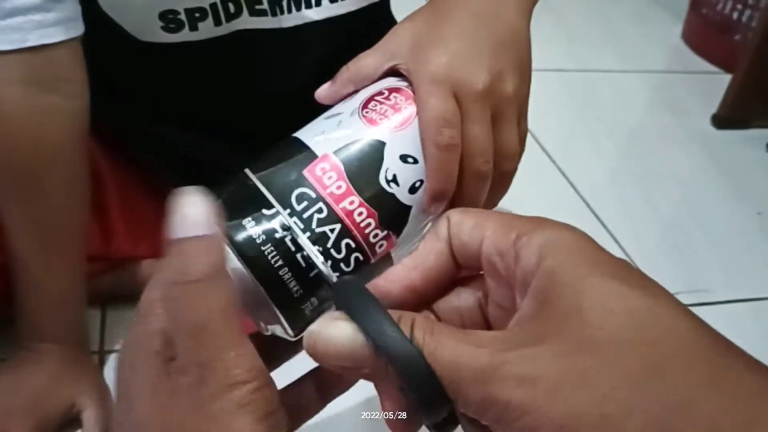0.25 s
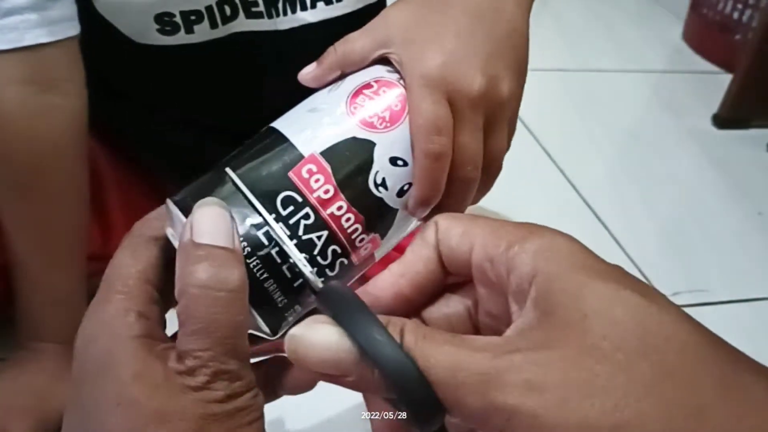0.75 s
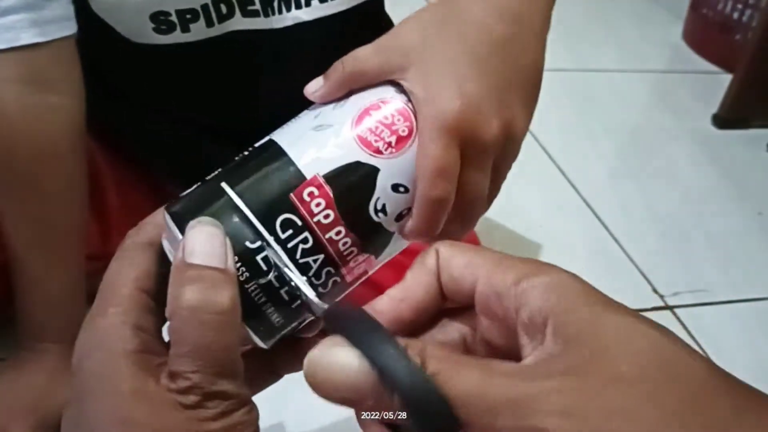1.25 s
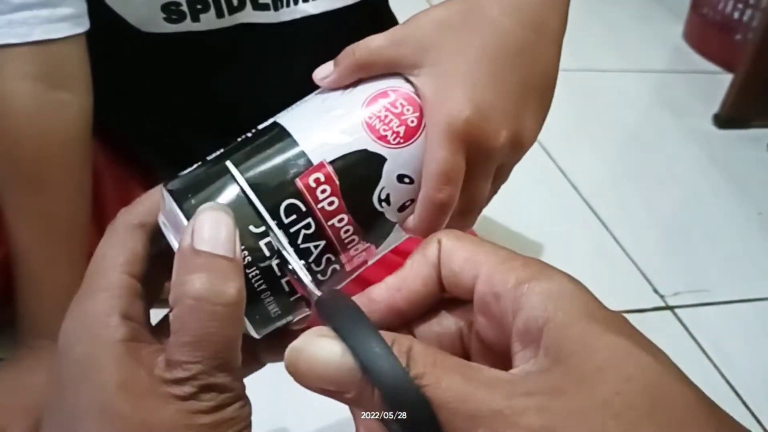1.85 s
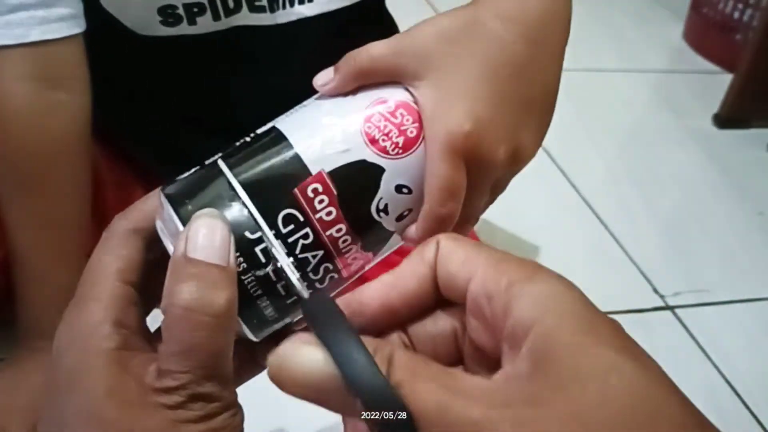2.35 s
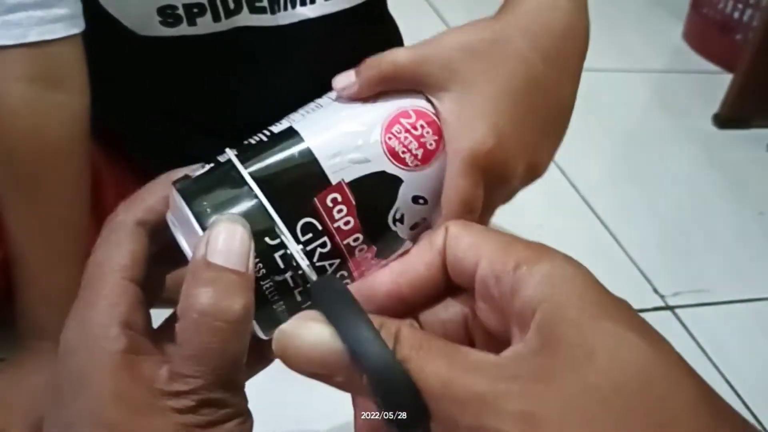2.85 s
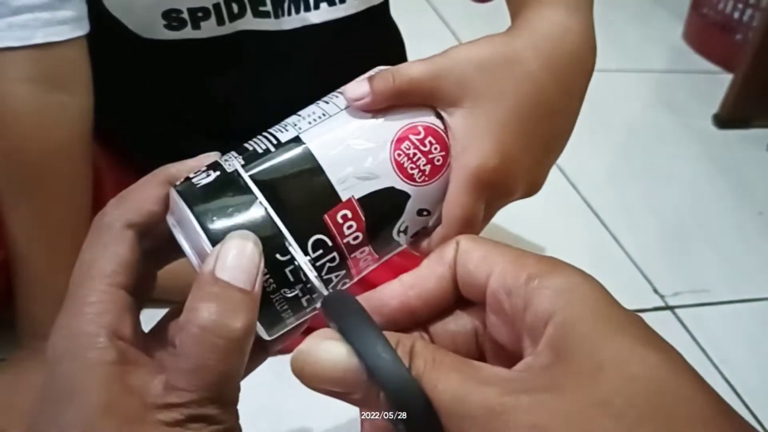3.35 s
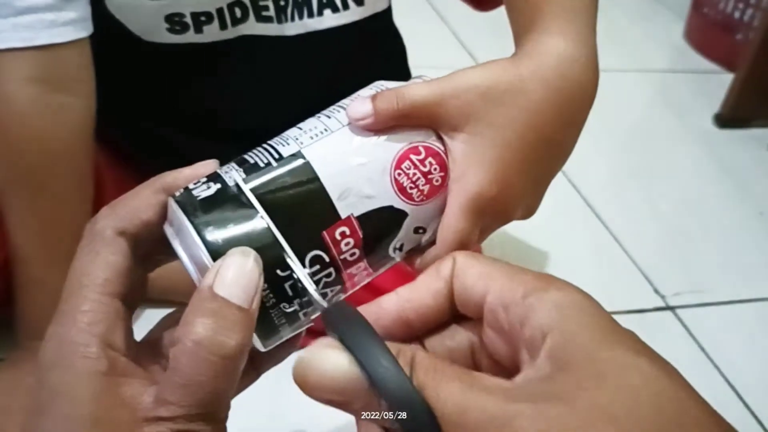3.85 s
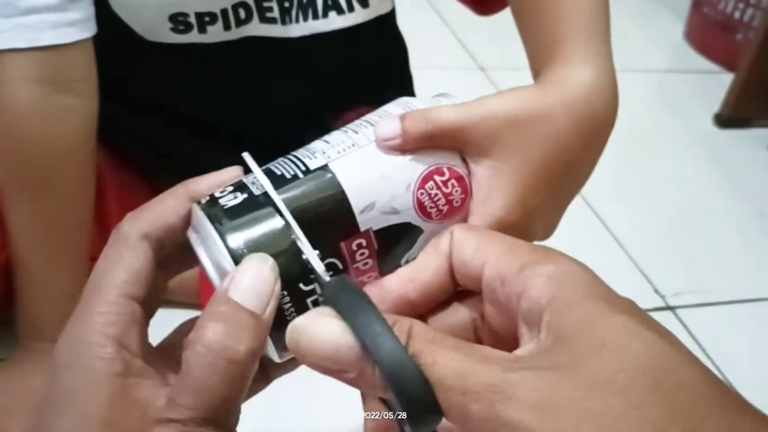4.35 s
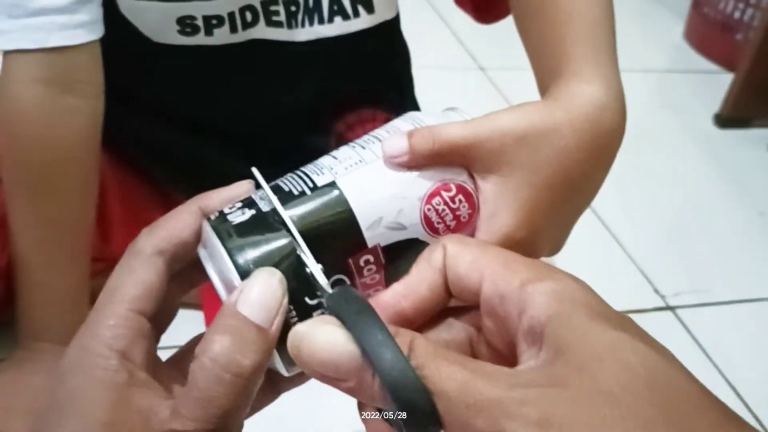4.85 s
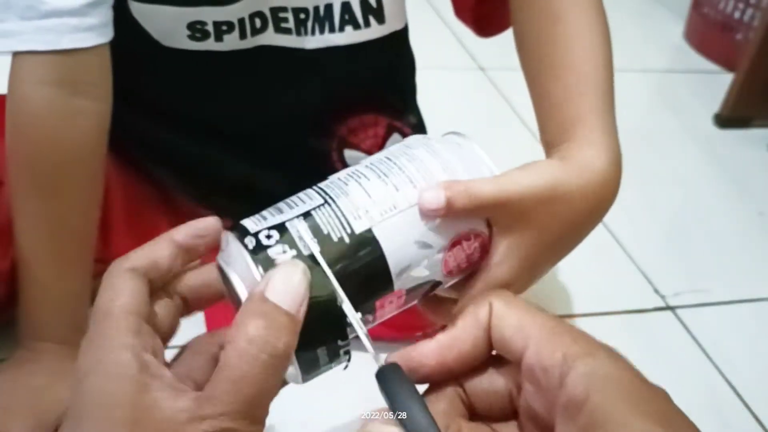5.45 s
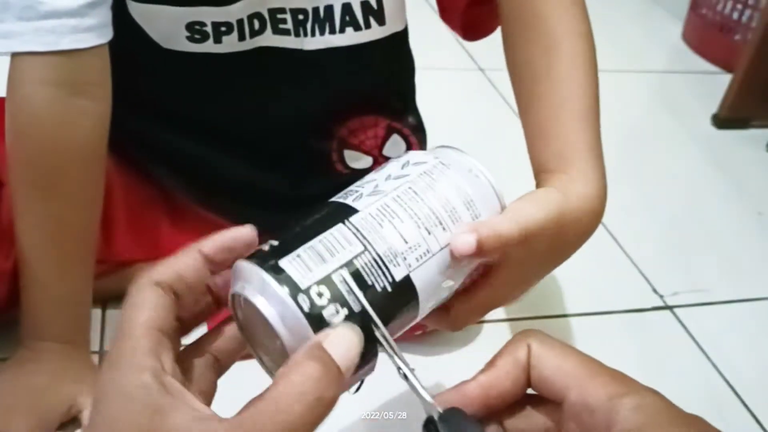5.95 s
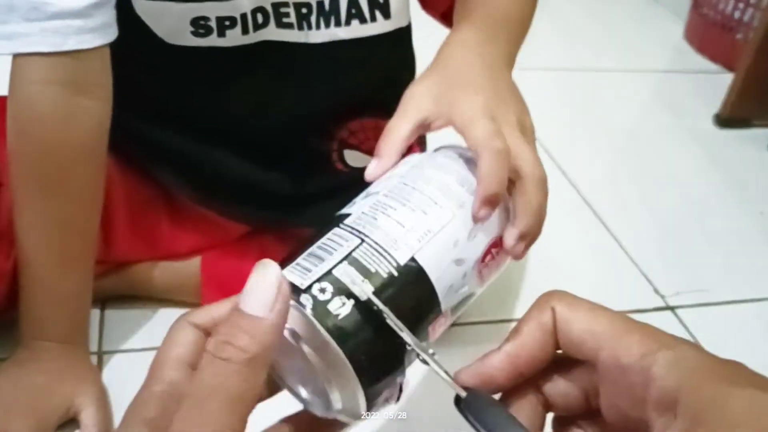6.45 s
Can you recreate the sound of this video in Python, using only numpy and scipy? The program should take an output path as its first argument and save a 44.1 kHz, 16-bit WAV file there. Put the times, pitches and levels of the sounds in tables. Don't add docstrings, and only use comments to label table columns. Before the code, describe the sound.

Loud close crunches and clicks of thin sheet metal being snipped, dents popping, blades grinding and briefly squealing, in a small hard-surfaced room.

```python
import sys
import numpy as np
from scipy import signal
from scipy.fft import rfft, irfft
from scipy.io import wavfile
from scipy.ndimage import uniform_filter1d

SR = 44100
rng = np.random.default_rng(int(sys.argv[2]) if len(sys.argv) > 2 else 0)


def gain_from_db(level_db):
    decades = np.asarray(level_db, float) / 20
    return 10 ** decades


def store_wav(level_fs):
    pcm = np.round(np.clip(np.atleast_2d(level_fs), -1, 1) * 32767)
    wavfile.write(sys.argv[1], SR, pcm.T.astype(np.int16))


N = 295029


def rms_one(x):
    return x / np.sqrt(np.mean(x ** 2) + 1e-20)


def in_time(rows):
    s, *columns = np.transpose(rows)
    return [np.interp(np.arange(N) / SR, s, c) for c in columns]


def at_hz(points, hz):
    table_hz, value = np.array(points).T
    return np.interp(np.log(hz + 1), np.log(table_hz), value)


def drift(rate_hz):
    r = np.exp(-2 * np.pi * rate_hz / SR)
    wander = signal.lfilter([1], [1, -2 * r, r * r], rng.standard_normal(N + SR))
    return rms_one(wander[SR:])


def passed(x, hz, kind, order=2):
    return signal.sosfilt(signal.butter(order, hz, kind, fs=SR, output="sos"), x)


def resonance(x, hz, width_hz):
    r = np.exp(-np.pi * width_hz / SR)
    gain = np.sqrt(1 - r * r) / 2
    feedback = [1, -2 * r * np.cos(2 * np.pi * hz / SR), r * r]
    return signal.lfilter(gain * np.array([1, 0, -1]), feedback, x)


# t/s, peak level/dB, brightness/dB, after-ring/dB
DENT_TICKS = [(1.342, -13.5, -12.5, -21), (1.582, -36, -6, -24), (.94, -38, -5, -25),
              (1.824, -34, -12, -10), (4.289, -34, -14, -20), (4.27, -30, -20, -20), (4.238, -30, -20, -20),
              (6.44, -34, -20, -20), (1.773, -36, -6, -24), (2.178, -20.5, -9, -7.5),
              (2.229, -10.5, -19, -22), (2.375, -17.5, -5.5, -36), (2.717, -13.5, -15, -19),
              (2.941, -15.5, -13.5, -28), (3.137, -15.5, -32, -16.5), (3.165, -26.5, -34, -11),
              (3.203, -24, -23, -40), (3.256, -31, -13, -18), (4.787, -36.5, -22, -22),
              (3.644, -19.5, -11.5, -12.5), (3.789, -21, -30, -34), (4.255, -22.5, -21, -23.5),
              (4.426, -18, -25, -25.5), (4.499, -11.5, -14.5, -44.5), (5.998, -25, -14, -4.5),
              (6.657, -18.5, -30, -23.5), (6.673, -29.5, -1, -13)]
BUCKLES = [(.582, -27, -13, -17), (.745, -23.5, -17, -21.5), (1.092, -26.5, -29, -24),
           (2.283, -11.5, -13.5, -16.5), (2.299, -9, -17, -23), (2.354, -15.5, -13.5, -31.5),
           (3.763, -15, -20, -15.5), (3.9, -8, -4, -15), (3.947, -6.5, -31, -17), (4.454, -18, -16, -8.5),
           (4.482, -9.5, -13, -46), (4.72, -25, -27, -22), (4.872, -22, -8.5, -36.5), (5.257, -16, -8, -32),
           (5.287, -29, -10, -37), (6.048, -3, -5, -25.5), (6.32, -17.5, -4.5, -19.5),
           (6.609, -27, -8.5, -19)]
CRACKS = [(-.06, 0.5, -13, -15), (.323, -5, -48, -26), (1.16, -25, -17, -19.5), (2.031, -5, -30, -26),
          (2.038, -9.5, -7, -27.5), (2.079, -13, -21, -18.5), (2.492, 2, -26.5, -18),
          (2.52, -3.5, -17, -38), (2.642, -3, -5, -20), (2.657, -3.5, -8, -38), (3.036, -28, -18, -23),
          (3.509, -15, -40, -18.5), (3.615, -23, -24, -8), (3.936, -2.5, -27, -12), (3.985, -1.5, -25, -21),
          (4.019, 5, -26.5, -32.5), (4.039, -9, -29, -11.5), (4.161, -13, -33, -19.5),
          (4.883, -6, -5.5, -18.5), (4.976, -2, -10, -18), (5.764, 2, -13.5, -20.5), (5.807, -3, -26, -18),
          (6.009, 1, -44, -21), (6.147, -6, -35, -6), (6.418, -25.5, -9.5, -14), (6.622, -13.5, -20, -17)]
TEARS = [(.245, -4, -30, -17), (.377, 2.5, -20.5, -23), (.4435, -3, -23.5, -50), (.694, -29, -27, -13.5),
         (1.609, -7, -24, -20.5), (2.197, -9, -18, -13.5), (2.502, 2.5, -27, -24),
         (3.095, -9, -10.5, -19.5), (3.439, -28.5, -15, -14), (3.48, -17, -26.5, -14.5),
         (3.674, 1, -18, -19.5), (3.887, -22.5, -24.5, -32), (5.15, -6, -11.5, -17), (5.198, -13, -21, -37),
         (6.026, -6, -21, -23), (6.163, -1, -9.5, -30.5), (6.168, -7, -12, -30), (2.527, -8, -25, -30),
         (6.594, -26.5, -24, -14)]
NIPS = [(.266, 0, -30, -32.5), (1.14, -1, -12.5, -19.5), (1.2025, -1, -15, -21.5), (1.229, -13.5, -17, -10),
        (1.332, -2, -7.5, -24.5), (1.416, 4, -17, -30.5), (1.954, -15.5, -43, -28), (2.007, -7.5, -46, -8),
        (2.014, -7.5, -54, -20), (2.059, 1.5, -35, -32), (2.91, -15, -44, -12.5), (2.9945, 1.5, -32, -21.5),
        (4.971, 8, -18, -40.5), (5.361, -6, -6, -21.5), (5.375, -8, 3.5, -28), (5.398, -29, 9, -30.5),
        (5.431, -7.5, -8, -14), (6.302, -26, -20, -33)]
SHEARS = [(.2185, 1.5, -22, -21), (2.481, -18.5, -20.5, -30.5), (1.917, -25, -18, -30),
          (1.924, -16, -26, -22), (1.946, -20, -30, -14), (1.974, -14, -52, -20), (2.928, -13, -39.5, -7),
          (2.9585, 4, -32, -23.5), (3.486, -10, -34, -29.5), (5.026, -3.5, -20, -24),
          (5.063, -3, -29.5, -20.5)]


def all_snaps():
    # snaps, boom/dB, tear/ms
    kinds = [(DENT_TICKS, -12, 2.38), (BUCKLES, -14.5, 6.4), (CRACKS, -23, 3.06),
             (TEARS, -22.5, 5.2), (NIPS, -32.5, 3.22), (SHEARS, -32.5, 5.3)]
    return np.transpose([(*row, boom_db, tear_ms) for rows, boom_db, tear_ms in kinds for row in rows])


def bursts(db, rise_s, fall_s):
    power = np.zeros(N + SR)
    rises, falls = rise_s + 0 * db, np.maximum(fall_s + 0 * db, .0005)
    for s, gain, rise, fall in zip(all_snaps()[0], gain_from_db(db), rises, falls):
        t = np.arange(int(min(9 * fall, .5) * SR)) / SR
        at = int((s + .1007) * SR)
        power[at:at + len(t)] += (gain * (1 - np.exp(-(t / rise) ** 2)) * np.exp(-t / fall)) ** 2
    return np.sqrt(power[SR // 10:SR // 10 + N])


BAND_EDGES_HZ = [280, 1400, 2900, 5500, 9300, 17000]
# f/Hz, width/Hz, level/dB
HOLLOW = [(455, 180, -6), (684, 39, -6), (765, 58, -8), (915, 74, -2), (1100, 450, 0)]
# f/Hz, width/Hz, level/dB
SHELL = [(1900, 220, -9), (2033, 56, -10.5), (2635, 900, -3), (3184, 210, 0), (3686, 380, 1),
         (4500, 920, 2.5), (5520, 550, 0), (5930, 340, -1.5), (7540, 990, 2.5), (8210, 180, 2),
         (8740, 1100, -2), (13800, 2800, -12), (15070, 720, -4.5)]


def metal(envelopes, scatter, modes_db):
    force, out = rng.standard_normal((2, N)) * scatter, 0
    dense_db = [0.0, -16.5, -14.5, -6.0, -6.5]
    for envelope, low, high, db in zip(envelopes, BAND_EDGES_HZ, BAND_EDGES_HZ[1:], dense_db):
        out = out + gain_from_db(db) * passed(force[0] * envelope, [low, high], "band")
    grip_db = [1.56 * drift(5.5) for k in range(5)]
    for k, (hz, width_hz, db) in enumerate(HOLLOW + SHELL):
        band = np.clip(np.searchsorted(BAND_EDGES_HZ, hz) - 1, 0, 4)
        push = force[1] * envelopes[band] * gain_from_db(grip_db[k % 5])
        out += (-1) ** k * gain_from_db(db + modes_db) * resonance(push, hz, width_hz)
    return out


def fine_modes(x, t60):
    t = np.arange(SR // 5) / SR
    response = rng.standard_normal(len(t)) * gain_from_db(-60 * t / t60)
    return signal.fftconvolve(x, response / np.sqrt(np.sum(response ** 2)))[:N]


AFTER_RING_T60_S = [0.3, 0.37, 0.43, 0.4, .33]


def snaps():
    s, peak_db, bright_db, ring_db, boom_db, tear_ms = all_snaps()
    band_db = [peak_db + boom_db + 15.5,
               peak_db + 0.24 * boom_db + 3,
               peak_db - 5.5,
               peak_db + 0.5 * bright_db + 6,
               peak_db + bright_db + 13.5]
    slow_s = 0.33 * np.clip(tear_ms - 3, 0, None) / 1000
    bite_db = 4 - 2 * tear_ms
    tears, tails = [], []
    for db, rise_s, t60 in zip(band_db, [.0008] + 4 * [.00015], AFTER_RING_T60_S):
        tear = bursts(db, rise_s + slow_s, tear_ms / 1000)
        bite = bursts(db + bite_db, .00008, 0.00045)
        tears.append(np.hypot(tear, bite))
        tails.append(bursts(db + ring_db + 4.5, 0.0059, t60 / np.log(1000)))
    cracks = metal(tears, scatter=0.83, modes_db=-6.5)
    diffuse = metal(tails, scatter=gain_from_db(2.43 * drift(150)), modes_db=-7)
    shell_answer = diffuse + fine_modes(diffuse, t60=0.046)
    return cracks + gain_from_db(-11.0) * room(cracks) + gain_from_db(-3.0) * shell_answer


# t/s, peak level/dB, f/Hz
CLICKS = [(0.2663, 0, 4570.0), (0.3234, -7, 4220.0), (0.3794, 0, 8010.0), (0.4452, -7, 7410.0),
          (1.1417, 0, 8700.0), (1.2047, -2, 1980.0), (1.3339, -1, 7410.0), (1.3424, -5, 7320.0),
          (1.4183, -1, 8870.0), (1.611, -2, 8100.0), (2.0078, -13, 3700.0), (2.0325, -9, 3530.0),
          (2.0599, 0, 3530.0), (2.0809, -12, 8790.0), (2.4928, 0, 3190.0), (2.5035, -3, 7840.0),
          (2.5211, -7, 7750.0), (2.6582, 0, 7320.0), (2.9595, 0, 3270.0), (3.0966, -5, 6550.0),
          (3.6749, 0, 5680.0), (3.901, -1, 8440.0), (4.0204, 0, 1380.0), (4.4826, -5, 1120.0),
          (4.4971, -11, 1210.0), (4.8843, 0, 8100.0), (5.0649, -7, 4390.0), (5.1526, -4, 8790.0),
          (5.3624, 0, 5600.0), (5.7652, 0, 7580.0), (5.8086, -7, 1810.0), (6.01, -2, 2330.0),
          (6.0498, 0, 7490.0), (6.1483, -10, 1030.0)]


def clicks():
    out, t = np.zeros(N + SR), np.arange(SR // 100) / SR
    for s, db, hz in CLICKS:
        at = int(s * SR)
        out[at:at + len(t)] += gain_from_db(db) * np.exp(-t / .0004) * np.sin(2 * np.pi * hz * t)
    return out[:N]


# start t/s, hardest t/s, end t/s, level/dB
STROKES = [(0, 0.092, 0.17, -36.5), (1.723, 1.855, 1.92, -42), (4.28, 4.39, 4.44, -44),
           (1.87, 1.983, 2.2, -39), (2.115, 2.227, 2.54, -34), (2.861, 3.05, 3.217, -33),
           (3.594, 3.654, 3.66, -34), (3.82, 3.95, 4.29, -33), (4.42, 4.5, 4.57, -27.5),
           (4.9, 5.05, 5.21, -29), (5.874, 6.023, 6.44, -36.5), (6.303, 6.514, 6.7, -43.5)]


def grinding():
    t = np.arange(N) / SR
    press_db, ease_db, lift_s = 8.5, 9.5, 0.021
    closed = 0
    for start, hardest, end, db in STROKES:
        push_db = np.interp(t, [start, hardest, end], [db - press_db, db, db - ease_db])
        touching = np.clip(np.minimum(t - start, end - t) / lift_s, 0, 1)
        closed = closed + gain_from_db(push_db) * touching
    slip_happens = rng.random(N) < 7000 / SR
    slips = slip_happens * gain_from_db(3.0 * np.minimum(rng.exponential(1, N), 4))
    pressure = uniform_filter1d(closed, size=800) * gain_from_db(-4.5 + 1.0 * drift(61))
    shares_db = [3, 3.0, 5.5, 2.0, 2.5]
    return metal([pressure * gain_from_db(db) for db in shares_db], scatter=rms_one(slips), modes_db=-8.0)


def wavering_tone(rows, rough_db, wander):
    hz, db = in_time(rows)
    t = np.arange(N) / SR
    inside = np.clip(np.minimum(t - rows[0][0], rows[-1][0] - t) / .008, 0, 1)
    turns = np.cumsum(hz * (1 + wander)) / SR
    return np.sqrt(2) * inside * gain_from_db(db + rough_db) * np.sin(2 * np.pi * turns)


# start t/s, end t/s, top f/Hz, first level/dB, last level/dB
SQUEALS = [(4.205, 4.43, 8420, -43, -51), (4.262, 4.39, 8040, -47, -54), (4.19, 4.41, 10750, -54, -60),
           (4.23, 4.4, 4580, -50, -58), (4.26, 4.38, 12800, -63, -64), (4.165, 4.22, 17400, -49, -50),
           (4.21, 4.262, 15800, -52, -43), (4.405, 4.452, 15900, -46, -55), (4.43, 4.465, 16700, -46, -47),
           (5.92, 6.03, 14420, -53, -46), (5.915, 6.0, 13020, -53, -55), (5.975, 6.02, 11000, -50, -55)]
# t/s, share of top pitch [1]
BEND = [(4.165, .74), (4.215, .89), (4.262, .988), (4.32, 1.0), (4.405, .974), (4.46, .86), (5.9, .97),
        (5.955, 1.0), (6.04, .985)]


def squeals():
    rough_db, wander = 2.3 * drift(60), 0.0013 * drift(150)
    bend = in_time(BEND)[0] - 1 + wander
    return sum(wavering_tone([(start, hz, first_db), (end, hz, last_db)], rough_db, bend)
               for start, end, hz, first_db, last_db in SQUEALS)


def pops(rows, sag, extra_db):
    out, t = np.zeros(N + SR), np.arange(SR // 3) / SR
    for (s, db, hz, t60), (split, phase) in zip(rows, rng.random((len(rows), 2))):
        turns = hz * (t + sag * 0.026 * (1 - np.exp(-t / 0.017)))
        partner = turns * (1.1 + 0.032 * split) + phase
        pair = np.sin(2 * np.pi * turns) + 0.95 * np.sin(2 * np.pi * partner)
        fade = gain_from_db(db + extra_db - 60 * t / max(t60, .01)) * (1 - np.exp(-t / 0.00017))
        at = int(s * SR)
        out[at:at + len(t)] += fade * pair
    return out[:N]


# t/s, peak level/dB, f/Hz, time to die by 60 dB t/s
DENTS = [(0.219, -20, 558, 0.15), (0.377, -7.5, 1113, 0.025), (0.443, -10, 950, 0.02),
         (1.61, -8, 850, 0.022), (2.718, -3.5, 857, 0.031), (3.789, -18.5, 870, 0.071),
         (3.9, -19.5, 782, 0.14), (3.945, -11, 917, 0.12), (3.985, 1.5, 854, 0.051),
         (4.018, 2.5, 1100, 0.016), (4.039, -18, 980, 0.08), (4.481, -18, 924, 0.18),
         (6.048, -23, 915, 0.064), (6.146, -19.5, 470, 0.061), (6.161, -5.5, 1060, 0.026)]


def dents():
    return pops(DENTS, sag=0.034, extra_db=-6)


def rings(rows, width_hz, share):
    out, t = np.zeros(N + SR), np.arange(SR // 2) / SR
    for (s, db, hz, t60), noise in zip(rows, rng.standard_normal((len(rows), len(t)))):
        width = width_hz + share * hz
        cluster = rms_one(resonance(resonance(noise, hz, width), hz, width))
        fade = gain_from_db(db - 4.5 - 60 * t / max(t60, .02)) * np.minimum(t / .002, 1)
        at = int(s * SR)
        out[at:at + len(t)] += fade * cluster
    return out[:N]


# t/s, peak level/dB, f/Hz, time to die by 60 dB t/s
RIM = [(.219, -19, 1860, 0.22), (.245, -24, 610, 0.45), (.444, -14.5, 2090, 0.12), (1.14, -34.5, 676, 1),
       (1.203, -20, 1910, 0.33), (.262, -22.5, 540, 0.2), (5.807, -8, 1750, 0.05),
       (2.491, -27.5, 720, 0.69), (2.74, -20.5, 786, 0.26), (3.487, -33, 2280, 0.15),
       (2.958, -8.5, 1530, 0.051), (3.486, -29, 1930, 0.31), (4.16, -33.5, 908, 0.641),
       (5.764, -30, 775, 0.42), (5.764, -15.5, 3350, 0.33), (5.764, -8.5, 8000, 0.16),
       (6.008, -13.5, 1713, 0.18), (4.47, -19, 400, 0.17)]


def rim_rings():
    return rings(RIM, width_hz=30, share=0.07)


# t/s, peak level/dB, f/Hz, time to die by 60 dB t/s
FLEX = [(2.205, -24, 1400, .2), (2.225, -26, 1300, .15), (2.29, -24, 1500, .15), (2.31, -26, 1200, .1),
        (2.34, -27, 1050, .12), (5.77, -22, 2200, .4), (5.81, -25, 2100, .15), (1.145, -25, 1550, .3),
        (4.99, -17, 4300, .5), (3.68, -18, 6100, .4), (2.525, -22, 3300, .15), (4.16, -31, 2000, .06),
        (4.426, -26, 2900, .05), (4.455, -24, 3000, .06), (4.05, -28, 3200, .3), (5.0, -22, 4000, .25),
        (5.257, -24, 7900, .15), (6.17, -16, 7800, .1), (1.61, -17, 8300, .33), (1.61, -20, 4400, .4),
        (1.95, -26, 3500, .25), (5.37, -24, 2800, .4), (5.766, -18, 12000, .3), (.38, -18, 3300, .2),
        (1.58, -36, 8000, .08), (1.773, -36, 8000, .08), (6.165, -16, 4000, .12)]


def wall_flexing():
    return rings(FLEX, width_hz=200, share=0.25)


# t/s, peak level/dB, f/Hz, time to die by 60 dB t/s
END_TONES = [(5.766, -23, 772, .6), (3.452, -42, 1920, .5), (3.725, -22, 1000, .04), (1.205, -26, 1895, .4),
             (2.505, -30, 690, .5), (3.9, -28, 923, .4), (4.47, -30, 425, .25), (5.79, -25, 3310, .35),
             (5.79, -28, 8180, .25)]


def end_tones():
    return rings(END_TONES, width_hz=25, share=0.008)


# t/s, peak level/dB, f/Hz, time to die by 60 dB t/s
THUMPS = [(.469, -29, 89, 0.049), (3.738, -34, 90, 0.13), (5.376, -22, 75, 0.03), (5.376, -36, 199, 0.025)]


def thumps():
    return pops(THUMPS, sag=0.041, extra_db=4.5)


# f/Hz, time to die by 60 dB t/s
ROOM = [
    (300, 0.38),
    (4000, 0.27),
    (15000, 0.23),
]


def room(x):
    t = np.arange(SR * 2 // 3) / SR
    white, edges, tail = rng.standard_normal(len(t)), np.geomspace(150, 18000, 8), 0
    for low, high in zip(edges, edges[1:]):
        t60 = at_hz(ROOM, np.sqrt(low * high))
        tail = tail + passed(white, [low, high], "band") * gain_from_db(-60 * t / t60)
    tail = tail * np.clip((t - .006) / 0.019, 0, 1)
    return signal.fftconvolve(x, tail / np.sqrt(np.sum(tail ** 2)))[:N]


# f/Hz, level per Hz/dB
AMBIENCE = [(18, -23), (100, -6.5), (480, -14.5), (1200, -24.5), (4200, -27), (8000, -30.5), (10500, -36.5),
            (15500, -31)]
# t/s, level/dB
RUMBLE = [(0, -46.5), (.45, -43), (1, -52.5), (1.45, -40), (2, -46), (2.3, -38.5), (2.9, -44.5),
          (3.17, -41.5), (3.35, -49.5), (3.75, -39.5), (4.5, -44), (4.72, -53), (5.1, -39), (5.7, -50.5),
          (5.9, -40.5), (6.25, -38.5), (6.69, -46.5)]
# t/s, f/Hz, level/dB
DRONE = [
    (1.3, 137.9, -66),
    (1.588, 135.4, -42),
    (2.2, 129.7, -51.5),
]


def ambience():
    hz = np.arange(N // 2 + 1) * SR / N
    noise = irfft(rfft(rng.standard_normal(N)) * gain_from_db(at_hz(AMBIENCE, hz)), N)
    low = passed(noise, 250, "low")
    scale = np.sqrt(np.mean(low ** 2))
    rumble = low * gain_from_db(in_time(RUMBLE)[0] + 1.1 * drift(12))
    rumble = passed(rumble, 43, "high", order=3)
    hiss = gain_from_db(-52.0) * passed(noise, 190, "high")
    engine = wavering_tone(DRONE, 0.81 * drift(9), 0.0022 * drift(7))
    return (rumble + hiss) / scale + engine


def scene():
    near = clicks() + grinding() + squeals() + dents() + rim_rings()
    can = snaps() + near + wall_flexing() + end_tones()
    return (can + thumps() + gain_from_db(-14.5) * room(near) + ambience())[None]


def gate(x, knee_db, range_db, depth_db):
    low = passed(x, 450, "low", order=1)
    level_db = 10 * np.log10(uniform_filter1d((x - low) ** 2, size=700) + 1e-12)
    return low + (x - low) * gain_from_db(-depth_db * np.clip((knee_db - level_db) / range_db, 0, 1))


def duck(x, knee_db, ratio, release_db_s, attack_s):
    slope = release_db_s * np.arange(N) / SR
    level_db = 10 * np.log10(uniform_filter1d(x ** 2, size=128) + 1e-12)
    held_db = np.maximum.accumulate(np.maximum(level_db - knee_db, 0) + slope) - slope
    r = np.exp(-1 / (attack_s * SR))
    return x * gain_from_db(-ratio * signal.lfilter([1 - r], [1, -r], held_db))


def top_cut(x):
    return signal.sosfilt(signal.butter(12, 16820, fs=SR, output="sos"), x)


def record(dry):
    x = gate(dry[0], knee_db=-31.0, range_db=13.5, depth_db=10.5)
    x = duck(x, knee_db=-21.5, ratio=0.25, release_db_s=132, attack_s=0.0094)
    x = passed(np.clip(x, -.93, .93), 40, "high")
    x = signal.sosfilt(signal.cheby2(14, 42, 15700, fs=SR, output="sos"), x)
    return top_cut(x[None])


dry = scene()
out = record(dry)
store_wav(out)
```